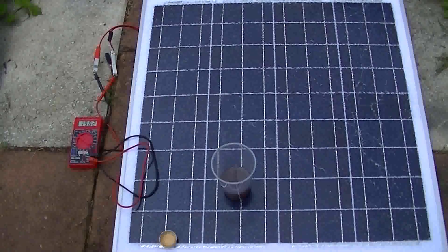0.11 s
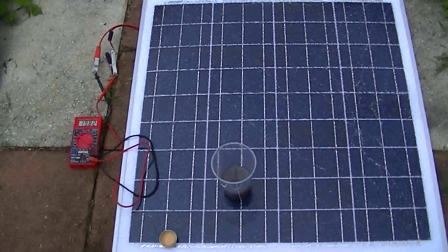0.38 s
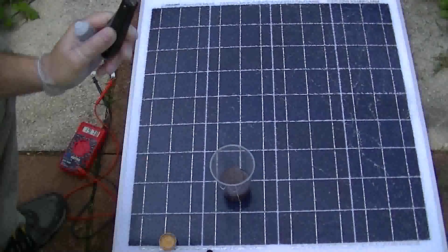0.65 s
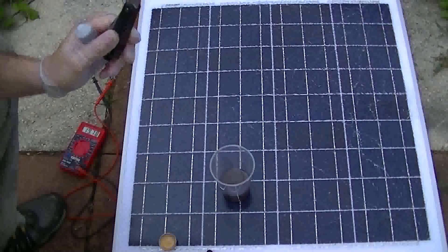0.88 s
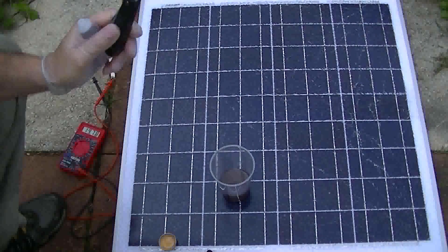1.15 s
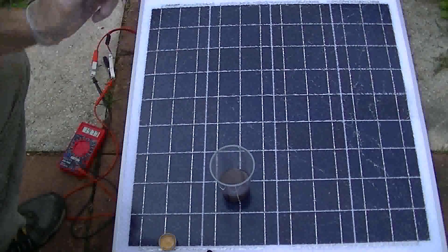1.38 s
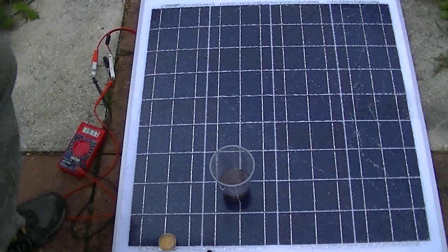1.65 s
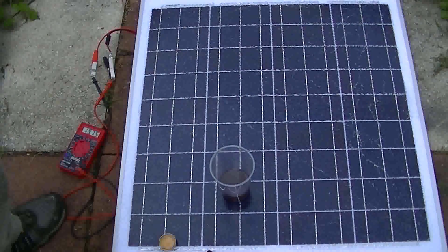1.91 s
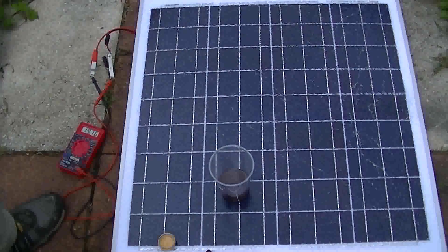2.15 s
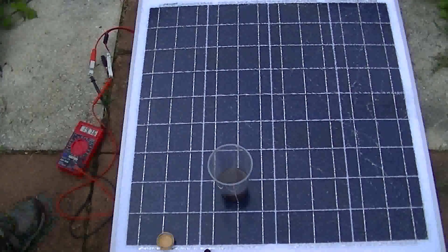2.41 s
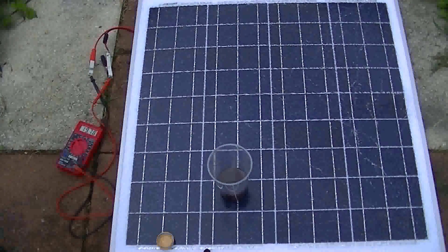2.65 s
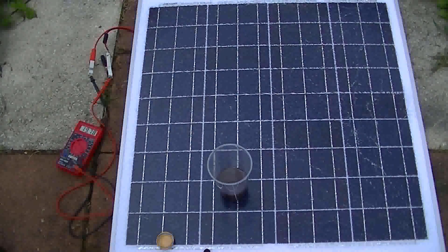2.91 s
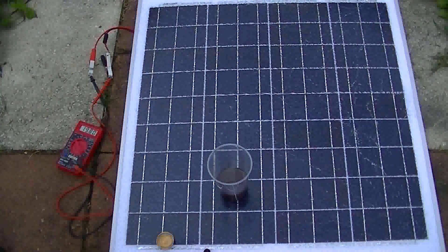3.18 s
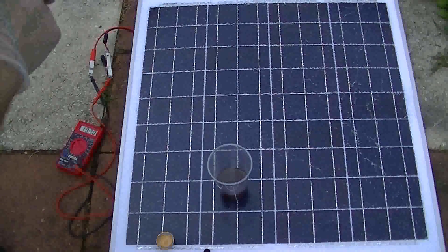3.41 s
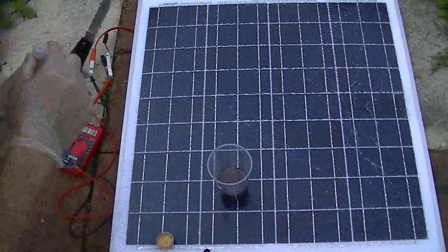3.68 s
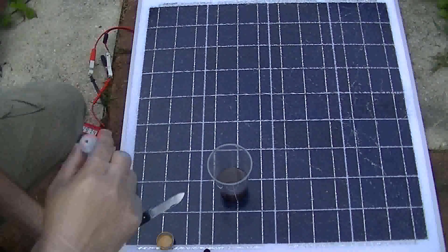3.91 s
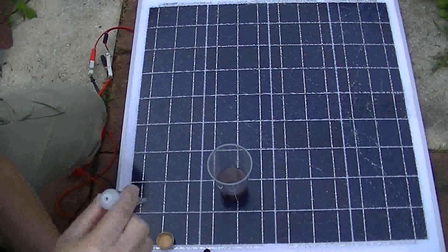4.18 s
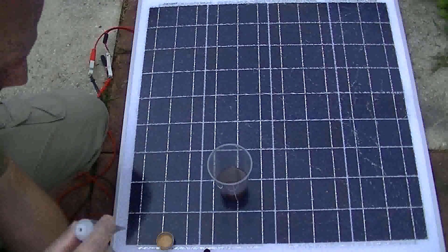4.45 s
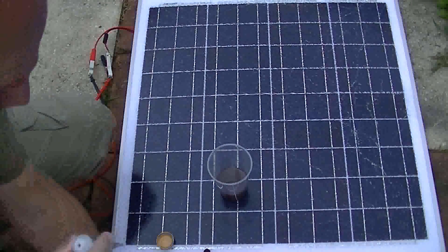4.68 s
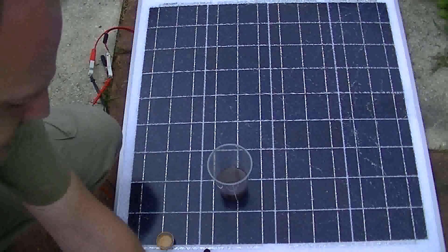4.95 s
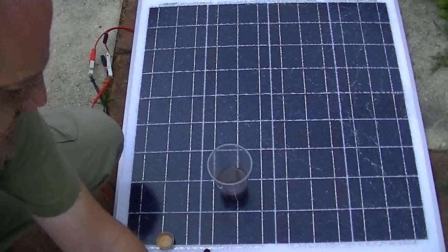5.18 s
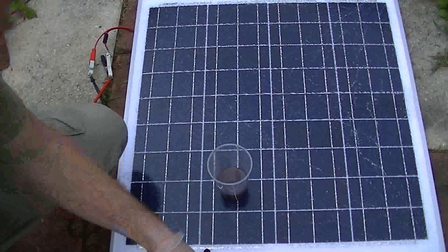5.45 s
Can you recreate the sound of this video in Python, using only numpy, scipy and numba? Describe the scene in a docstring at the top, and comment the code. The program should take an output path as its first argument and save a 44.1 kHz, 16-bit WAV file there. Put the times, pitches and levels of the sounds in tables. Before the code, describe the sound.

Steady summer cicada chorus outdoors with one voice sinking in pitch each second, while close hands click plastic and metal and drag something hollow over paving.

```python
"""A dense cicada chorus fills a summer yard: resonated random ticks; one cicada sinks in pitch about once a second.
Thin high trills, narrow fluttering noise bands, sit to the left.
Close by, hands click plastic and metal things (struck resonances); scuffs, cloth and grit are filtered ticks.
A hollow body is dragged over paving three times (stick-slip into modes), over a far traffic hum of shaped noise.
The sound drops out briefly near the start."""
import sys
import numpy as np
from scipy import signal
from scipy.fft import rfft, irfft
from scipy.io import wavfile
from scipy.ndimage import uniform_filter1d
from numba import njit

SR = 44100
rng = np.random.default_rng(int(sys.argv[2]) if len(sys.argv) > 2 else 0)


def wrap_up_sound(samples):
    """Save the sound to the file named by the first command line argument, as 16-bit audio."""
    columns = np.atleast_2d(samples).T
    # keep every value between -1 and 1, then stretch to whole-number steps
    tamed = np.clip(columns, -1, 1)
    steps = np.round(tamed * 32767).astype(np.int16)
    wavfile.write(sys.argv[1], SR, steps)


def invert_db(x):
    """Field ratio 10**(x/20) for x, a level in decibels (scalar or array-like)."""
    u = np.asarray(x, float) / 20
    return 10 ** u


N = 245637


def column(table, k):
    """One column of a curve, joined by straight lines in time."""
    rows = np.array(table)
    return np.interp(np.arange(N) / SR, rows[:, 0], rows[:, k])


def unit(x):
    """Scale to rms 1."""
    return x / np.sqrt(np.mean(x ** 2))


def peak(x):
    """Scale to peak 1."""
    return x / np.abs(x).max()


def steady(x, span_s=0.053):
    """Hold the short-time level near rms 1."""
    return x / np.sqrt(uniform_filter1d(x ** 2, int(span_s * SR)) + 1e-12)


@njit
def svf(x, hz, width_hz):
    """State-variable band-pass with a moving centre, gain 1 there."""
    y, band_state, low_state = np.empty(len(x)), 0., 0.
    for i in range(len(x)):
        g = np.tan(np.pi * hz[i] / SR)
        k = width_hz / hz[i]
        v = (band_state + g * (x[i] - low_state)) / (1 + g * (g + k))
        band_state = 2 * v - band_state
        low_state = low_state + 2 * g * v
        y[i] = k * v
    return y


def band(x, hz, width_hz):
    """Steep resonance: the band-pass twice."""
    hz = np.minimum(hz, .45 * SR) + np.zeros(len(x))
    return svf(svf(x, hz, 1. * width_hz), hz, 1. * width_hz)


def colour(x, points):
    """Filter by a (hz, db) curve, straight in log frequency."""
    hz, db = np.transpose(points)
    f = np.maximum(np.fft.rfftfreq(N, 1 / SR), 1)
    gain = invert_db(np.interp(np.log(f), np.log(hz), db))
    return irfft(rfft(x) * gain, N)


def walk(rate):
    """Random levels held 1 / rate s and slewed twice; spread near 1."""
    k = int(SR / rate)
    held = np.repeat(rng.standard_normal(N // k + 1), k)
    return 1.22 * uniform_filter1d(uniform_filter1d(held, k), k)[:N]


def grains(rate, spread_db):
    """Random one-sample ticks of uneven size, rate per second."""
    hit = rng.random(N) < rate / SR
    return hit * rng.standard_normal(N) * invert_db(spread_db * rng.exponential(size=N))


def add(out, s, sound):
    """Mix a short sound in at a time."""
    i = int(s * SR)
    out[i:i + len(sound)] += sound[:N - i]


# tymbal resonances: hz, width_hz, relative_db
TYMBAL_MODES = [(5054, 980, 1), (5480, 500, -0.5), (6076, 470, 2), (6480, 610, 0)]
# chorus loudness: time_s, level_db
CHORUS_LEVEL = [(0.0, -50), (0.57, -49.5), (0.68, -47), (1.35, -47), (1.66, -47.5), (2.4, -49),
                (3.83, -47.5), (5.57, -47.5)]


def chorus():
    """Thousands of tymbal clicks a second blur into a hiss; each resonance wavers alone."""
    rings = 0
    for hz, width_hz, db in TYMBAL_MODES:
        waver = invert_db(db + 1.3 * walk(14))
        rings = rings + waver * unit(band(grains(9000, 0.97), hz, width_hz))
    return invert_db(column(CHORUS_LEVEL, 1)) * unit(rings)


# sinking cicada phrases: start_s, length_s, level_db, first_hz, resting_hz
SINKER_PHRASES = [(-.15, 0.83, -52.5, 3450, 3000), (0.67, 0.52, -52, 3730, 2820),
                  (1.54, 0.59, -52.5, 3720, 2890), (2.512, 0.67, -52, 3640, 2750),
                  (3.49, 0.55, -51.5, 3680, 2830), (4.517, 0.63, -51, 3780, 2780),
                  (5.242, 0.19, -51.5, 2900, 2800), (5.437, 0.22, -49.5, 2770, 2580)]
SINKER_SLIDE_S = .18


def sinker():
    """A rough click train; in each phrase the abdomen resonance slides down fast, then settles."""
    throb_hz = 63 * (1 + 0.057 * walk(2.7))
    throb = 1 + 0.13 * np.sin(2 * np.pi * np.cumsum(throb_hz) / SR)
    buzz = throb * grains(5000, 0.45)
    out = 0
    for start_s, length_s, db, first_hz, rest_hz in SINKER_PHRASES:
        u = np.clip((np.arange(N) / SR - start_s) / length_s, 0, 1)
        hz = rest_hz + (first_hz - rest_hz) * np.exp(-u * length_s / SINKER_SLIDE_S)
        swell = np.sin(np.pi * u ** 0.72) ** 0.99
        out = out + invert_db(db) * swell * steady(band(buzz, hz, 480), 0.105)
    return out


def stroke(start_s, rise_s, hold_s, fall_db_s):
    """Gain that rises, holds, then dies away at a steady rate."""
    t = np.arange(N) / SR - start_s
    return np.clip(t / rise_s, 0, 1) * invert_db(-fall_db_s * np.clip(t - rise_s - hold_s, 0, 3))


# thin high trills, levels before panning: full_level_s, hold_s, level_db, centre_hz
TRILLS = [(.59, 0.047, -62, 12000), (.68, 0.16, -66, 12000), (3.335, .05, -66, 12000),
          (3.33, .16, -69, 13000), (3.41, 0.084, -61, 12000), (3.55, .04, -67, 12000),
          (3.72, .03, -67, 13000), (3.862, .09, -73, 12000), (5.33, .03, -73, 12000)]
TRILL_WIDTH_HZ, TRILL_RISE_S, TRILL_FALL_DB_S = 540, 0.022, 500


def chirr():
    """Narrow, fluttering noise trills near the top."""
    flutter = invert_db(1.8 * walk(60)) * rng.standard_normal(N)
    out = 0
    for full_s, hold_s, db, hz in TRILLS:
        gain = invert_db(db) * stroke(full_s - TRILL_RISE_S, TRILL_RISE_S, hold_s, TRILL_FALL_DB_S)
        out = out + gain * unit(band(flutter, hz, TRILL_WIDTH_HZ))
    return out


# clicks, levels before panning: time_s, peak_db, thing, high_minus_low_ring_db
CLICK_EVENTS = [(0.122, -30, "spoon", -8), (.182, -26.5, "spoon", -24), (.3995, -17, "cup", 3),
                (.5678, -26, "cap", 5), (.5937, -3.5, "latch", -10), (.59412, -8, "latch", -10),
                (0.6105, -4, "latch", -10), (.61086, -7, "latch", -8), (1.187, -31, "cap", -4),
                (1.2702, -22, "cap", 2), (1.2733, -30, "cap", -5), (1.2788, -20.5, "cap", 5),
                (1.31, -19, "cap", 1.5), (1.344, -22.5, "cap", 4), (1.371, -29.5, "cap", -5),
                (1.681, -27, "bottle", 0), (1.9722, -15.5, "lid", 4.5), (1.9907, -21.5, "tip", -8),
                (2.0729, -24, "spoon", 6), (2.191, -32, "cup", -19), (2.2053, -26.5, "panel", 0),
                (2.224, -34.5, "spoon", 0), (2.263, -26, "tip", 8), (2.609, -29, "panel", -1),
                (2.685, -32, "lid", -2), (2.6925, -21.5, "bottle", -9), (2.7046, -28, "bottle", -12),
                (2.7083, -31, "panel", -12), (2.7332, -16.5, "bottle", -5), (3.0225, -19.5, "cup", 2),
                (3.8657, -23.5, "handle", -2), (4.577, -35.5, "handle", -10), (5.1171, -25, "panel", 4.5),
                (5.2335, -22.5, "bottle", -25), (5.2387, -25.5, "panel", 3.5)]
# things in the hands: low_ring_hz, high_ring_hz, t60_s
THING_RINGS = {"latch": (2350, 5000, .0036), "cap": (3550, 5600, .0037), "bottle": (1650, 3100, .0058),
               "cup": (1100, 2350, .006), "lid": (1010, 3100, .0068), "panel": (590, 1350, .008),
               "spoon": (2050, 3300, .011), "handle": (2750, 3950, .008), "tip": (6000, 7800, .005)}


def clicks():
    """A very short blow into two heavily damped rings and a dull thump, with a little grit behind it."""
    out = np.zeros(N)
    t = np.arange(int(0.044 * SR)) / SR
    blow = np.exp(-.5 * ((t - .0002) / .00003) ** 2)
    grits = rng.standard_normal((len(CLICK_EVENTS), len(t)))
    for (s, db, thing, high_db), grit in zip(CLICK_EVENTS, grits):
        low_hz, high_hz, t60_s = THING_RINGS[thing]
        width_hz = 6.6 / max(t60_s, .002)
        shake = blow + 0.058 * grit * np.exp(-np.log(1000) * t / (7.4 * t60_s))
        low_ring = peak(band(shake, low_hz, width_hz))
        high_ring = invert_db(high_db) * peak(band(shake, high_hz, 1.14 * width_hz))
        thump = invert_db(-0.5) * peak(svf(shake, np.full(len(t), 0.47 * low_hz), 1.08 * low_hz))
        add(out, s - .0002, invert_db(db) * peak(low_ring - high_ring + thump))
    return out


def ring(hz, t60_s, length_s=.08):
    """A decaying mode."""
    t = np.arange(int(length_s * SR)) / SR
    return np.sin(2 * np.pi * hz * t) * np.exp(-np.log(1000) * t / max(t60_s, .001))


# metal clinks, levels before panning: time_s, peak_db, tilt_db_per_octave away from 4150 Hz, both ways
CLINK_EVENTS = [(5.1086, -3.5, 5.5), (5.12, -21, -10), (5.18, -21.5, -12)]
# modes of the metal piece, before tilt and choke: hz, relative_db, t60_s
METAL_MODES = [(1770, -12.5, 0.0085), (2460, -9, 0.025), (4110, -0.5, 0.034), (5000, -1, 0.022),
               (5520, 3, 0.03), (6450, 0.5, 0.021), (7540, -3.5, 0.029), (8190, -6, 0.071),
               (9940, -21, 0.024)]


def clinks():
    """A small metal piece struck and bouncing; softer touches ring narrower, gathered around 4.1 kHz, and
    fingers choke the ring."""
    out = np.zeros(N)
    t = np.arange(int(.08 * SR)) / SR
    rise = np.clip(t / .0004, 0, 1)
    choke = .1 + .9 / (1 + (t / .0046) ** 6)
    for s, db, tilt_db in CLINK_EVENTS:
        sound = 0
        for k, (hz, mode_db, t60_s) in enumerate(METAL_MODES):
            gain = invert_db(mode_db + tilt_db * abs(np.log2(hz / 4150)))
            # modes start out of step, so the blow is a burst, not a spike
            sound = sound + gain * np.roll(ring(hz, t60_s), -k * k)
        add(out, s, invert_db(db) * peak(sound * rise * choke))
    return out


# scuffs and rattles, levels before panning: start_s, length_s, start_level_db, centre_hz
SCUFF_EVENTS = [(0.397, 0.024, -39, 1680), (0.612, 0.0061, -17.5, 2070), (0.618, 0.01, -22.5, 1300),
                (0.626, 0.031, -31, 1970), (.665, .006, -40, 2200), (0.67, .009, -39, 2090),
                (1.976, 0.025, -36, 3130), (2.001, 0.025, -39.5, 1400), (2.005, .018, -51, 11000),
                (2.067, .011, -43.5, 1500), (2.254, .064, -43, 2170), (2.261, .016, -48, 8500),
                (2.378, 0.018, -45, 1500), (2.605, 0.015, -36, 1200), (2.69, .0084, -33, 2000),
                (5.189, 0.01, -34.5, 1200), (5.241, 0.0099, -39, 1190)]
SCUFF_FALL_DB, SCUFF_BASE_WIDTH_HZ, SCUFF_WIDTH_SHARE = 7.5, 1360, 0.33  # width grows with the centre


def scuffs():
    """Short gritty chatters of loose plastic and soles, each fading as it goes."""
    out = np.zeros(N)
    chatter = grains(6500, 2.2)
    for start_s, length_s, db, hz in SCUFF_EVENTS:
        i, n = int(start_s * SR), int(length_s * SR)
        shape = invert_db(db - np.linspace(0, SCUFF_FALL_DB, n)) * signal.windows.tukey(n, .25)
        width_hz = SCUFF_BASE_WIDTH_HZ + SCUFF_WIDTH_SHARE * hz
        add(out, start_s, shape * unit(band(chatter[i:i + n], hz, width_hz)))
    return out


# soft rounded bumps: middle_s, peak_db, pitch_hz, length_s
BUMP_EVENTS = [(0.44, -40, 1455, 0.028), (1.547, -45.5, 230, .039), (4.36, -41.5, 104, .098)]


def bumps():
    """Soft pushes that ring briefly on one pitch."""
    out = np.zeros(N)
    for middle_s, db, hz, length_s in BUMP_EVENTS:
        n = int(length_s * SR)
        tone = np.sin(2 * np.pi * hz * np.arange(n) / SR)
        add(out, middle_s - length_s / 2, invert_db(db) * np.hanning(n) * tone)
    return out


# pressure curve of each drag: time_s, pressure_db
DRAG_PRESSURE = [
    [(2.75, -46), (2.8, -39), (2.87, -38.5), (2.915, -36), (2.984, -37.5), (3.122, -47), (3.36, -53.5)],
    [(3.4, -50.5), (3.504, -33.5), (3.62, -37.5), (3.7, -39), (3.8, -46)],
    [(3.81, -39), (3.86, -32.5), (3.98, -31), (4.05, -34.5), (4.214, -44), (4.35, -49), (4.5, -57)],
]
# modes of the hollow body, in groups: hz, width_hz, share_db in drag 1, 2, 3
BODY_MODES = [
    [(585, 56, -2, -12, -8), (648.5, 39, -4, 2, 1), (681.5, 28, -8, -10, -5)],
    [(919, 57, -3, 8, -8), (990, 47, -9, 10.5, -20), (1026.5, 32, -3, -10, 6.5), (1105, 39, 1, 1, 2)],
    [(1198, 127, 13, 2, 3), (1312, 64, -7, -6, -10)],
    [(1500, 140, -13, -9, -6.5), (1673, 120, -14, -2, -6.5), (1794, 31, -21, -6, -5.5),
     (1841, 62, -4.5, -15, -4.5), (1950, 240, -3.5, -21, -8.5)],
]
# one row a drag: share_db of each mode group
GRIP_SHARES = [(-10, -19, -0.5, -6.5), (-3, -8.5, -12.5, -8.5), (-12, -6, -3.5, -5.5)]
# one row a drag: catch_delay_s of each mode group
CATCH_DELAYS = [(0, .03, .02, 0.033), (0, 0.036, .06, .02), (0, 0, .09, .03)]
# one a mode group: pressure_exponent, steeper in the upper groups
PRESSURE_EXPONENTS = (0.58, 0.98, 1.18, 1.14)
# one a drag: start_flat_share, the fraction by which the rings start flat
FLAT_SHARES = (.05, .1, .01)
START_GLIDE_S, CATCH_S, LIFT_S = .04, 0.045, 0.015
JUDDER_DB, JUDDER_PER_S = 2, 25


def drags():
    """Dense stick-slip under juddering pressure shakes the hollow body; each grip favours other modes."""
    out, t = 0, np.arange(N) / SR
    for n, curve in enumerate(DRAG_PRESSURE):
        start_s, end_s = curve[0][0], curve[-1][0]
        slip = grains(4000, 1.4) * invert_db(0.37 * walk(50))
        top_db = max(db for _, db in curve)
        since_s = np.maximum(t - start_s, 0)
        tune = 1 - FLAT_SHARES[n] * np.exp(-since_s / START_GLIDE_S)
        lift = np.clip((end_s - t) / LIFT_S + .5, 0, 1)
        groups = zip(BODY_MODES, GRIP_SHARES[n], CATCH_DELAYS[n], PRESSURE_EXPONENTS)
        for group, grip_db, delay_s, exponent in groups:
            rings = sum(invert_db(share_db[n]) * steady(band(slip, hz * tune, width_hz), 0.1)
                        for hz, width_hz, *share_db in group)
            skirt = unit(band(slip, group[len(group) // 2][0], 207))
            pressure_db = exponent * (column(curve, 1) - top_db)
            db = top_db + grip_db + pressure_db + JUDDER_DB * walk(JUDDER_PER_S)
            touch = lift * np.clip((t - start_s - delay_s) / CATCH_S + .5, 0, 1)
            out = out + touch * invert_db(db) * steady(unit(rings) + 0.2 * skirt)
    return out


# body movements that stir cloth and grit: middle_s, half_length_s, level_db (7.5-11 kHz)
RUSTLE_MOVES = [(.56, 0.12, -68), (1.293, 0.11, -59), (2.15, 0.39, -63), (2.897, 0.21, -60.5),
                (3.406, 0.14, -56), (3.8, 0.22, -59.5), (4.503, .4, -67.5), (5.395, 0.36, -62)]
# rustle spectrum: hz, relative_db
RUSTLE_SPECTRUM = [(300, -7), (1000, 5), (3000, 2), (6000, 5), (9000, -5), (15000, -25)]


def rustle():
    """Soft fine-grained hiss of fabric and grit, scaled by its treble; each movement swells and fades."""
    crackle = colour(grains(9000, 0.79) * invert_db(2.1 * walk(70)), RUSTLE_SPECTRUM)
    treble_band = signal.butter(4, [7500, 11000], "band", fs=SR, output="sos")
    treble = signal.sosfilt(treble_band, crackle)
    t = np.arange(N) / SR
    power = sum(invert_db(2 * db) * np.exp(-((t - middle_s) / half_s) ** 2)
                for middle_s, half_s, db in RUSTLE_MOVES)
    return np.sqrt(power) * crackle / np.std(treble)


# distant yard and traffic spectrum: hz, relative_db per Hz
YARD_SPECTRUM = [(15, -32), (25, -14), (68, 0), (116, 2.5), (184, -3.5), (542, -6.5), (981, -1),
                 (2260, -10), (2970, -10.5), (3990, -15.5), (4950, -4.5), (6140, -3.5), (7420, -20),
                 (13100, -24), (15800, -28.5)]
YARD_LEVEL_DB = -47.5


def yard():
    """Smooth far noise; the bass swells slowly, the rest flickers faster."""
    noise = unit(colour(rng.standard_normal(N), YARD_SPECTRUM))
    low = signal.sosfilt(signal.butter(2, 300, fs=SR, output="sos"), noise)
    swelling = low * invert_db(0.49 * walk(1.88))
    flickering = (noise - low) * invert_db(0.69 * walk(20))
    return invert_db(YARD_LEVEL_DB) * (swelling + flickering)


# likeness of the two ears: hz, correlation (0-1)
EAR_LIKENESS = [(30, 0.98), (250, 0.77), (600, 0.91), (2500, 0.91), (4000, 0.97), (6000, 0.96),
                (7500, 0.93), (14000, 0.79)]


def spread(make):
    """Two ears of a wide source: a shared part plus an independent opposed part."""
    hz, like = np.transpose(EAR_LIKENESS)
    like = np.clip(like, 0, .999)
    opposed_db = 10 * np.log10((1 - like) / (1 + like))
    opposed = colour(make(), np.transpose([hz, opposed_db]))
    return make() + opposed * np.array([[1], [-1]])


# where the hands work: time_s, left_minus_right_db
HANDS_PAN = [(0, -4.5), (.68, -3), (1.1, 1.4), (5.57, .3)]
TRILL_LEFT_MINUS_RIGHT_DB = 13
DRAG_OPPOSED_DB = -23  # opposed part relative to shared part


def scene():
    """All sources; wide ones spread between the ears, the hands sit where they work, the trills are left."""
    side_db = column(HANDS_PAN, 1)
    hands = (clicks() + clinks() + scuffs()) * invert_db(np.array([side_db, -side_db]) / 2)
    trills = chirr() * invert_db(TRILL_LEFT_MINUS_RIGHT_DB * np.array([[.5], [-.5]]))
    dragged = drags() + invert_db(DRAG_OPPOSED_DB) * drags() * np.array([[1], [-1]])
    cicadas = spread(chorus) + spread(sinker) + trills
    return cicadas + hands + bumps() + dragged + spread(rustle) + spread(yard)


def roll_off(x):
    """The treble ends steeply here."""
    return signal.sosfilt(signal.butter(12, 15950, fs=SR, output="sos"), x)


# silent stretch: start_s, end_s
SILENCE_S = (.4822, .5195)


def record(dry):
    """The sound drops out briefly, with 1 ms fades."""
    t = np.arange(N) / SR
    outside_s = np.maximum(SILENCE_S[0] - t, t - SILENCE_S[1])
    mix = dry * np.clip(outside_s / 0.001, 0, 1)
    return roll_off(mix)


dry = scene()
out = record(dry)
wrap_up_sound(out)
```